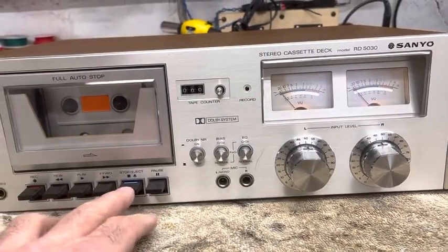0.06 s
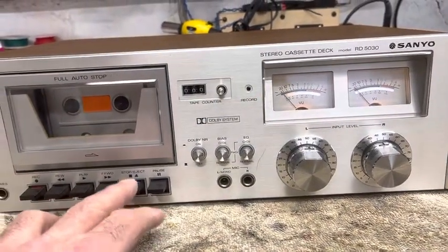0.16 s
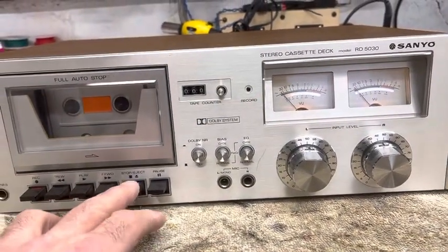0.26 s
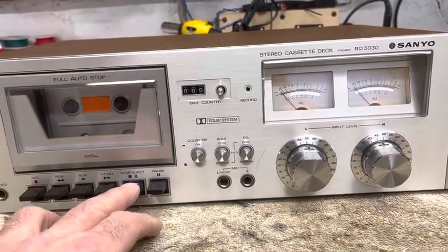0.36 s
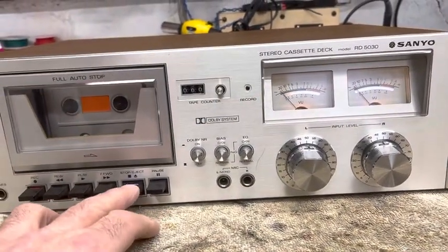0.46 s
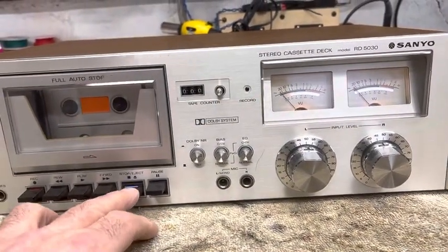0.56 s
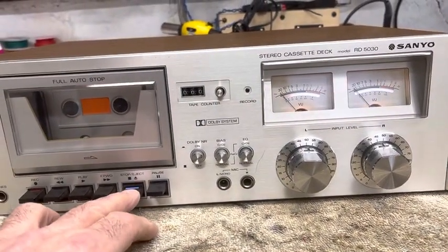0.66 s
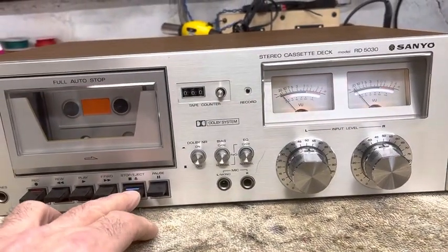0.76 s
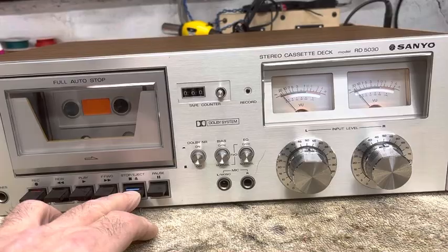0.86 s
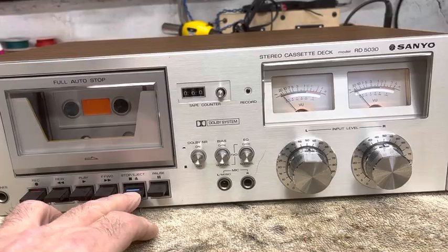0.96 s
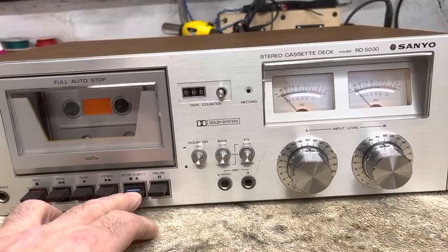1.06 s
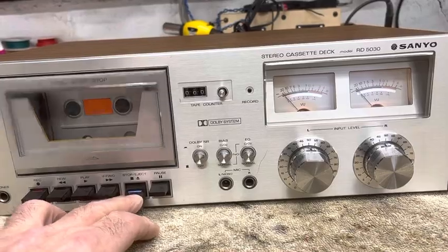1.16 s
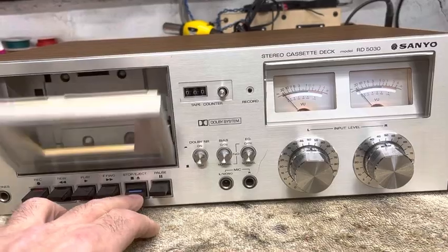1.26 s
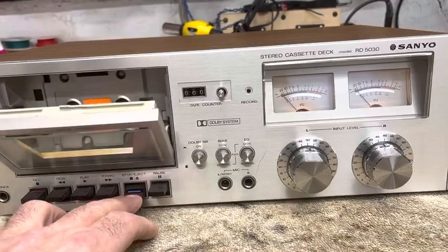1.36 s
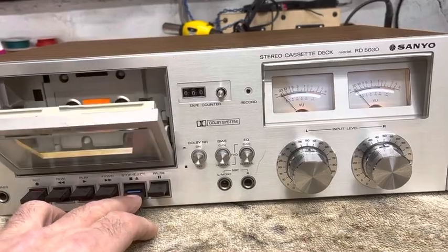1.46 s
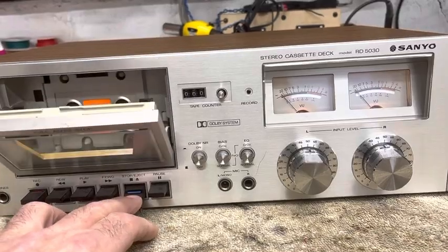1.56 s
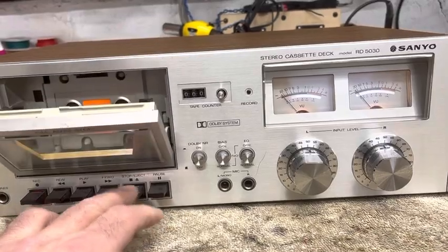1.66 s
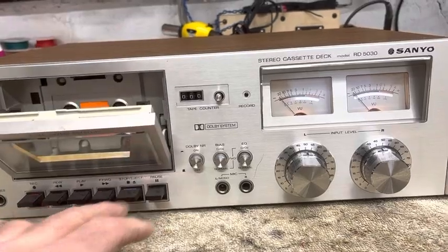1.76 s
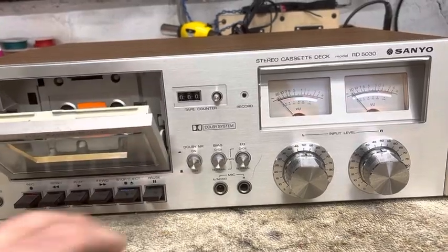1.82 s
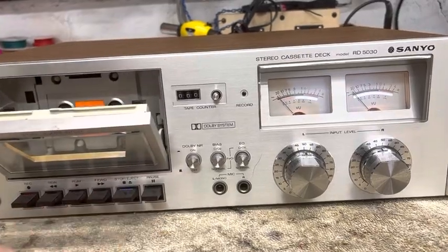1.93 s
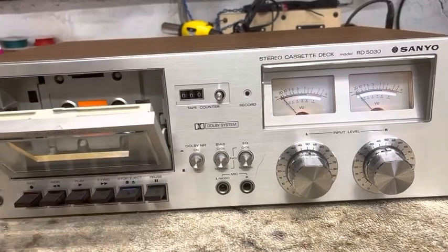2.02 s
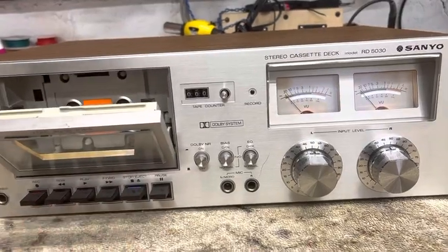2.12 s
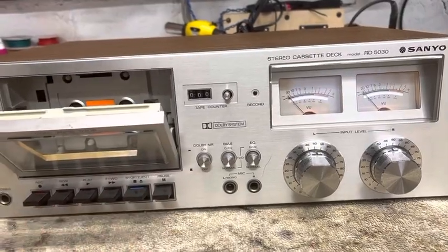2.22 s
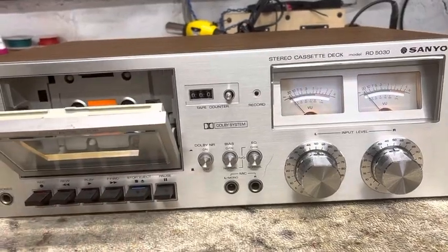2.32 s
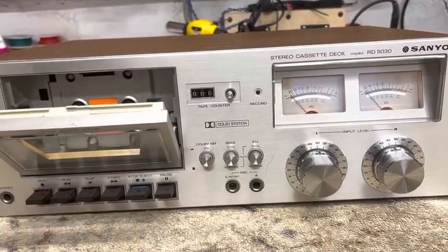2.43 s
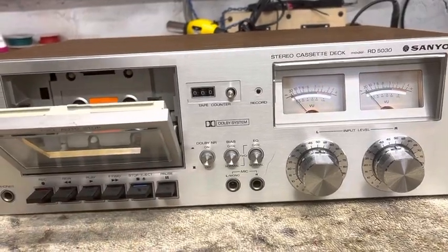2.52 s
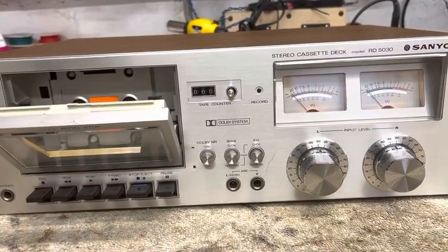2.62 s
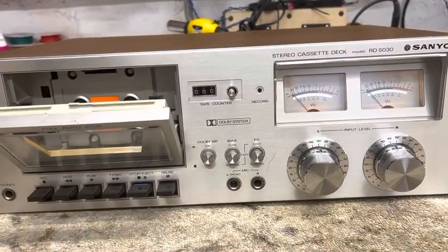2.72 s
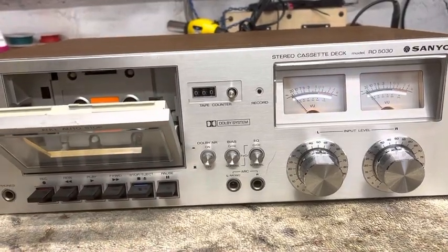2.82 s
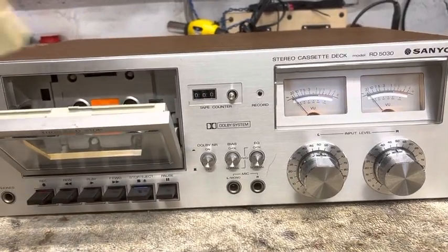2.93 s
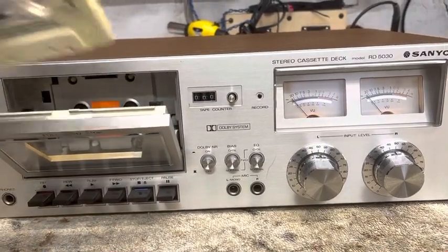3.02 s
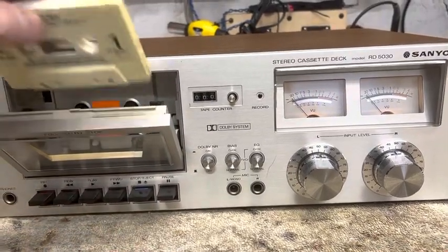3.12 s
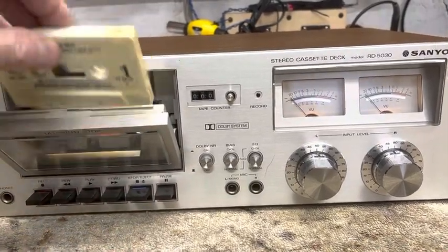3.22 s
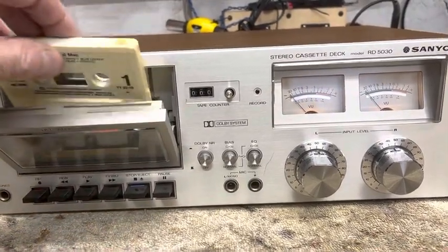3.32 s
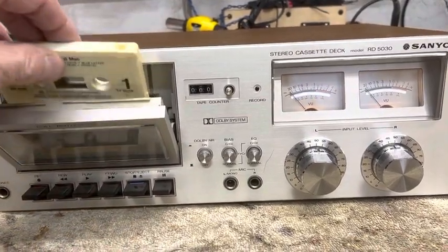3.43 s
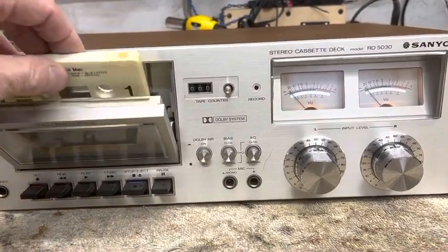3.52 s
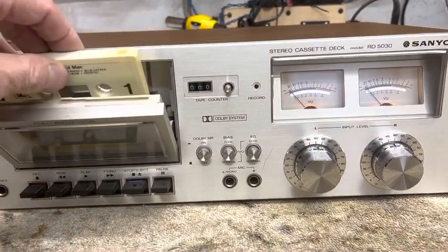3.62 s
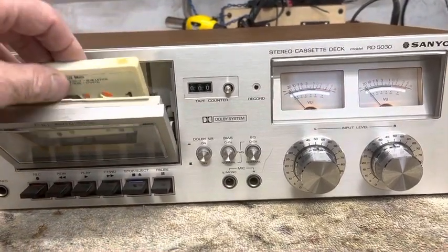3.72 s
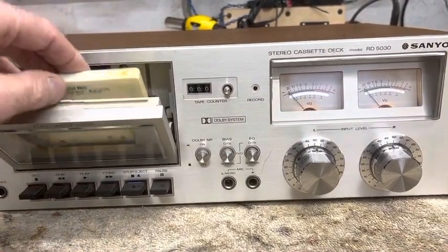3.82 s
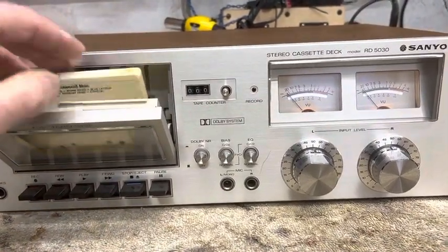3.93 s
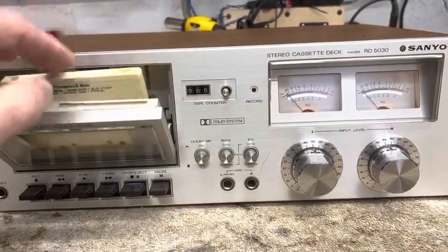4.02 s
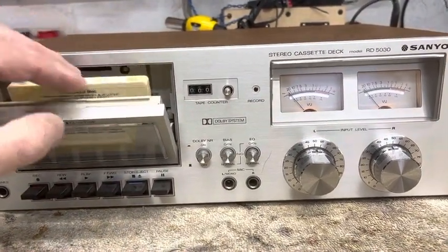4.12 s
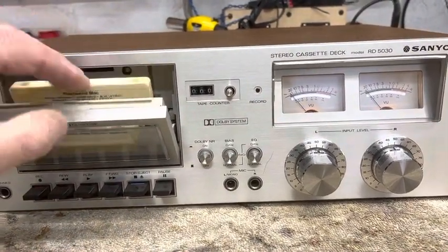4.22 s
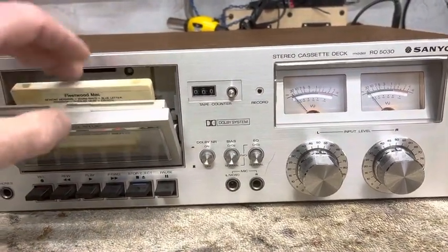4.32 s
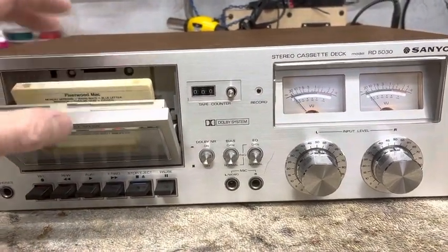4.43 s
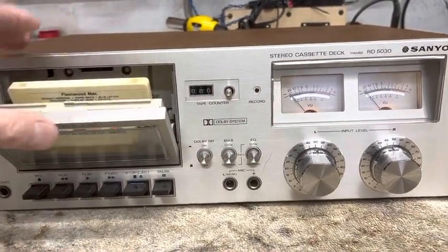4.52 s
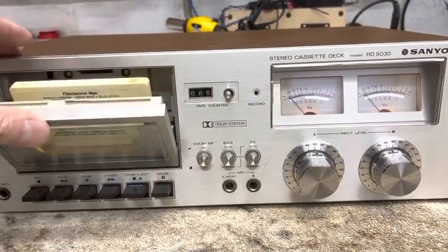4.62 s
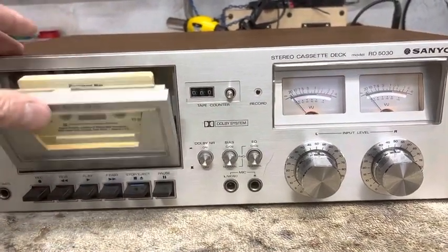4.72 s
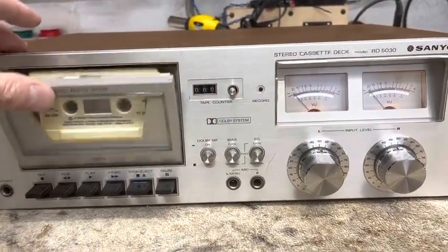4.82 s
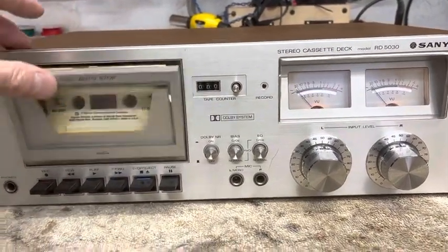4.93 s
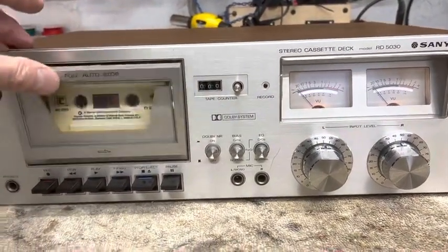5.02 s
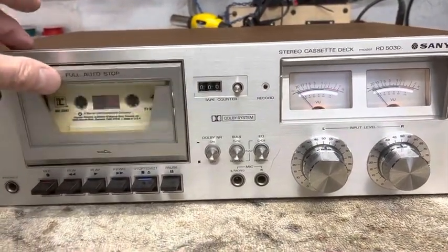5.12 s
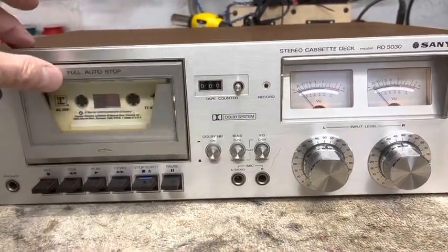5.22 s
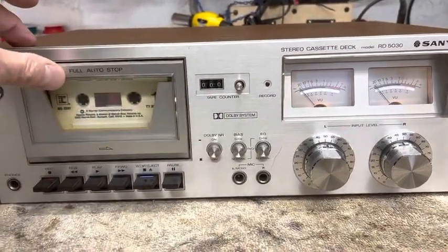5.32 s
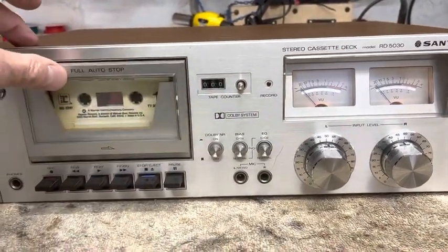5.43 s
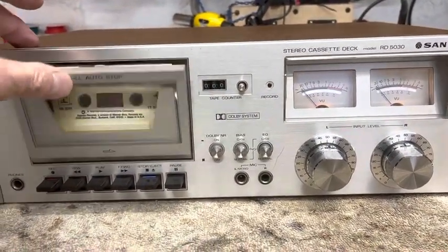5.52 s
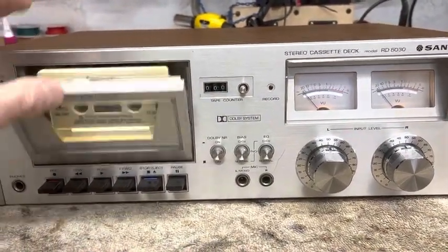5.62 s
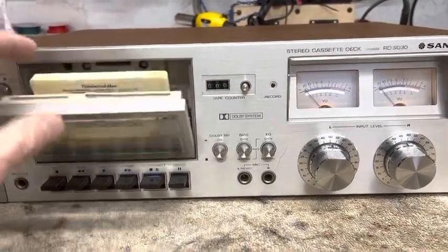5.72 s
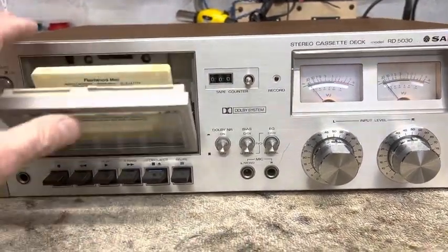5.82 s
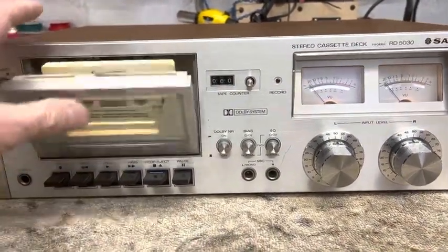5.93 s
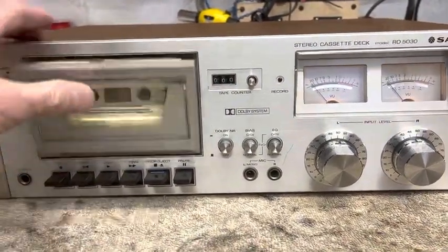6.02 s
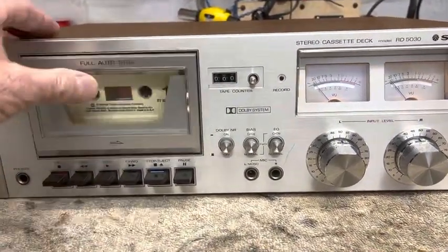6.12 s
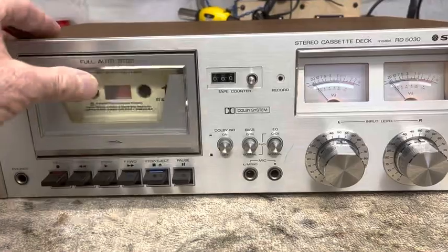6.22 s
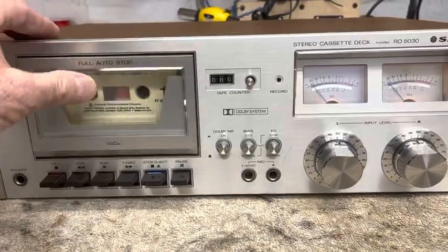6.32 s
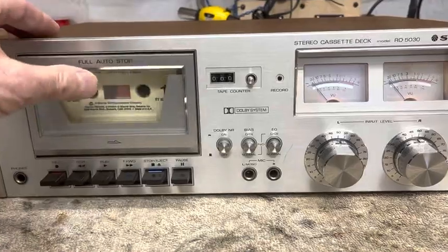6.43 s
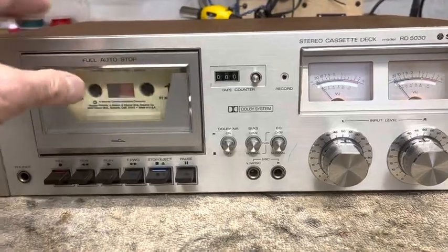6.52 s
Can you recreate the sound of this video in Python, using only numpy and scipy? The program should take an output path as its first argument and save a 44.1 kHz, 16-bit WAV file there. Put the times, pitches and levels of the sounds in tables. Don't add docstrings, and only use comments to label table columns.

```python
import sys
import numpy as np
from scipy import signal
from scipy.fft import rfft, irfft
from scipy.io import wavfile

SR = 44100
rng = np.random.default_rng(int(sys.argv[2]) if len(sys.argv) > 2 else 0)


def elevation(decibels):
    levels = np.asarray(decibels, float)
    return 10 ** (levels / 20)


def generate_wav(signal):
    frames = np.transpose(np.atleast_2d(signal))
    scaled = np.clip(frames, -1, 1) * 32767
    pcm = np.round(scaled).astype(np.int16)
    wavfile.write(sys.argv[1], SR, pcm)


N = 289737


def at_hz(points, hz):
    table_hz, value = np.transpose(points)
    return np.interp(np.log(hz + 1), np.log(table_hz + 1), value)


def rms_one(x):
    return x / np.sqrt(np.mean(x ** 2) + 1e-20)


def peak_one(x):
    return x / np.max(np.abs(x))


def band(x, lo_hz, hi_hz):
    return signal.sosfilt(signal.butter(2, [lo_hz, hi_hz], "band", fs=SR, output="sos"), x)


def ring(x, hz, t60):
    radius, angle = elevation(-60 / (t60 * SR)), 2 * np.pi * hz / SR
    return signal.lfilter([0, np.sin(angle)], [1, -2 * radius * np.cos(angle), radius * radius], x)


def resonant_noise(hz, width_hz):
    t60 = np.log(1000) / (np.pi * width_hz)
    noise = rng.standard_normal(N + SR)
    return rms_one(ring(ring(noise, hz, t60), hz, t60)[SR:])


def coloured(spectrum):
    gain = elevation(at_hz(spectrum, np.fft.rfftfreq(N, 1 / SR)))
    return rms_one(irfft(rfft(rng.standard_normal(N)) * gain, N))


def grains(per_s, uneven_db):
    happens = rng.random(N) < per_s / SR
    size = elevation(uneven_db * np.minimum(rng.exponential(1, N), 3.5))
    return happens * size * rng.choice([-1, 1], N)


def gestures(rows, rise_db_per_s, fall_db_per_s):
    t = np.arange(0, N + 32, 32) / SR
    start, held, *levels = np.array(rows).T[:, :, None]
    rise_db = abs(rise_db_per_s) * np.maximum(start - t, 0)
    fall_db = abs(fall_db_per_s) * np.maximum(t - start - held, 0)
    shape = elevation(-rise_db - fall_db)
    return [np.interp(np.arange(N) / SR, t, np.max(elevation(db) * shape, axis=0)) for db in levels]


def struck(rattle, modes, spread):
    body = 0
    for (hz, db, t60), c in zip(modes, spread):
        body = body + elevation(db) * (1 + .5 * c) * np.sign(c) * ring(rattle, hz, t60)
    return peak_one(body)


# frequency in Hz, level in dB, t60 in seconds.
CABINET_MODES = [(171, -19.5, 0.16), (196, 5.5, .1), (256.6, 0.5, 0.27), (268, -0.5, .08),
                 (349.7, 3.5, 0.055), (443, -1.5, 0.055)]
DOOR_PANEL_MODES = [(472, -11.5, 0.11), (532, -4, .05), (670, -5.5, 0.05), (725, -2.5, 0.067),
                    (759, 1.5, 0.057), (845, -1, 0.048), (970, -10, 0.043), (1039, 0.5, 0.033),
                    (1177, -2.5, 0.054), (1220, -9, 0.065), (1434, -2.5, .04)]
PLASTIC_SHELL_MODES = [(1272, 11, 0.015), (1690, 0.5, 0.0086), (1996, 4.5, 0.0081), (2145, -4, 0.038),
                       (2424, 0, 0.019), (2850, 2.5, 0.01103), (3300, 6, 0.0075), (3710, -4.5, 0.029),
                       (4260, 1.5, 0.0069), (4860, 0.5, 0.0044), (5520, -2, 0.0027), (6020, -23.5, 0.024)]
# time in seconds, peak in dB.
END_STOP_JOLTS = [(1.1983, -18), (1.2303, -23), (1.2474, -24), (1.2875, -22), (1.2992, -28.5),
                  (1.3379, -32.5), (1.6719, -28), (3.324, -28), (3.5263, -31), (3.9015, -29.5),
                  (4.1067, -25), (4.955, -26), (5.22, -26), (5.5977, -33), (6.0423, -32), (6.1664, -29),
                  (6.355, -26)]
CABINET_UNDER_PANEL_DB = -17.5


def contacts(rows):
    rattle_s, rise_s, edge_s = 0.0043, 0.00065, 0.0026
    out, t = np.zeros(N + SR), np.arange(SR // 5) / SR
    for s, click_db, part_hz, panel_db, edge_db in rows:
        jolt = [db for at, db in END_STOP_JOLTS if abs(at - s) < .0045]
        cabinet_db = jolt[0] if jolt else panel_db + CABINET_UNDER_PANEL_DB
        chance, spread = rng.standard_normal((2, len(t))), rng.uniform(-1, 1, (3, 12))

        slow = elevation(.11 * (panel_db + 29.5))
        chatter = np.exp(-t / (rattle_s * slow)) * (1 - np.exp(-t / (rise_s * slow)))
        rattle = chance[0] * np.abs(chance[0]) * chatter

        shell = struck(rattle, PLASTIC_SHELL_MODES, spread[0])
        shell += elevation(0.5) * peak_one(band(rattle, 960, 8440))
        top_hz = np.clip(16000 * elevation(0.32 * (edge_db - click_db)), 2200, 9000)
        shell = band(shell, 630, top_hz)
        loose_part = peak_one(ring(rattle, part_hz, 0.0075))
        click = peak_one(peak_one(shell) + elevation(-6) * loose_part)

        edge_fade = np.exp(-t / edge_s) + .1 * np.exp(-t / 0.0035)
        edge = peak_one(band(chance[1] * edge_fade, 7000, 15000))
        push = band(np.abs(rattle), 130, 320)

        sound = elevation(click_db) * click + elevation(edge_db + 14.5) * edge
        sound += elevation(panel_db) * struck(rattle, DOOR_PANEL_MODES, spread[1])
        sound += elevation(cabinet_db - 6.5) * struck(push, CABINET_MODES, spread[2])
        first = round(s * SR)
        out[first:first + len(t)] += sound
    return out[:N]


# time in seconds, click peak in
# dB, ringing part in Hz, door panel in dB, bright edge in dB.
DOOR_OPENS = [(1.158, -44, 2485, -38, -56.5), (1.222, -19, 4100, -22, -36.5),
              (1.1885, -10.5, 3396, -18, -12), (1.1983, -22, 1750, -18.5, -31.5),
              (1.2303, -16.5, 4000, -26.5, -32), (1.2474, -30.5, 1980, -27.5, -49.5),
              (1.2875, -23, 3710, -38.5, -43), (1.2992, -34, 3930, -25, -44),
              (1.3104, -34, 3600, -33, -61.5), (1.3379, -51, 2230, -31.5, -50),
              (1.6302, -29.5, 2500, -31.5, -42.5), (1.654, -29.5, 6100, -28, -41),
              (1.6719, -28, 5900, -29, -31), (1.6914, -42, 1520, -48, -67)]
CASSETTE_MEETS_HOLDER = [(2.5117, -42, 1660, -33.5, -79), (2.6434, -41, 4660, -49, -52.5),
                         (2.6625, -31.5, 2850, -34.5, -79), (2.693, -39, 2270, -35, -76),
                         (2.7154, -40.5, 1550, -42, -53), (2.7515, -45, 2300, -45, -60),
                         (2.7898, -49, 1640, -46, -57), (2.807, -33, 2400, -56, -71),
                         (2.9614, -38.5, 1810, -51, -93.5), (3.2803, -24.5, 2020, -28.5, -41),
                         (3.3012, -26, 3930, -30.5, -43), (3.324, -33, 1740, -32, -35),
                         (3.4316, -35, 3200, -36, -60), (3.459, -31, 2700, -35.5, -49),
                         (3.4744, -30, 3440, -46, -43), (3.4822, -27.5, 1785, -52, -65),
                         (3.4884, -42, 1780, -43, -49), (3.5163, -33, 1760, -34, -50),
                         (3.5263, -37.5, 2540, -47, -56)]
CASSETTE_DROPS_HOME = [(3.9015, -35.5, 5500, -33, -55), (3.972, -47, 1770, -43, -67),
                       (4.0925, -32, 2400, -29, -41), (4.1069, -17.5, 2300, -18.5, -22.5),
                       (4.2923, -47, 1730, -68, -75), (4.3216, -41, 2620, -39, -62),
                       (4.3443, -46, 1790, -42.5, -74), (4.953, -29, 1490, -27, -62),
                       (5.1873, -46, 1770, -42, -80), (5.219, -16, 3300, -19, -31),
                       (5.3577, -48, 3500, -42, -80)]
DOOR_LATCHES = [(5.5402, -29.5, 2060, -28, -38), (5.5521, -25, 3520, -31, -61),
                (5.574, -29, 3800, -31, -54), (5.5824, -25.5, 3630, -28, -35),
                (5.5976, -34.5, 1930, -45, -49), (5.6267, -36.5, 2190, -32.5, -57),
                (5.7394, -52, 2760, -40, -62), (5.9918, -28.5, 3750, -31, -50.5),
                (6.0092, -36, 4300, -26, -50), (6.0265, -21, 6070, -32, -33),
                (6.0424, -32, 3700, -31.5, -61), (6.124, -36.5, 1770, -38.5, -62),
                (6.138, -22, 1690, -23.5, -37), (6.1662, -6.5, 1650, -6, -21),
                (6.355, -19.5, 2190, -23, -43)]
FURTHER_CONTACTS = [(1.175, -28, 4300, -30, -40), (1.1815, -22, 3900, -28, -40), (1.2055, -30, 5800, -34, -48),
                    (1.2255, -23, 3900, -36, -42), (1.2535, -32, 4100, -34, -55), (1.266, -38, 1900, -40, -60),
                    (2.654, -40, 4800, -48, -62), (2.659, -42, 2500, -46, -70), (2.679, -38, 2800, -40, -70),
                    (2.685, -42, 4900, -46, -66), (5.2135, -33, 7000, -44, -44), (5.2165, -24, 3500, -32, -40),
                    (5.2255, -26, 2000, -27, -32), (5.531, -40, 2300, -42, -66), (5.5355, -34, 1400, -33, -60),
                    (5.5595, -34, 6800, -40, -50), (5.566, -38, 3300, -42, -56), (5.5785, -32, 2900, -36, -50),
                    (5.589, -36, 4000, -34, -58), (5.623, -46, 3000, -40, -70), (6.0315, -30, 3500, -28, -48),
                    (6.048, -38, 2600, -32, -62), (6.154, -34, 1650, -30, -70), (6.1955, -34, 2100, -29, -60),
                    (6.1705, -11, 3700, -15, -27), (3.312, -38, 2400, -33, -60), (3.339, -38, 4900, -36, -62),
                    (3.361, -46, 5300, -46, -70), (1.667, -33, 6500, -38, -44), (1.681, -37, 2600, -36, -50),
                    (1.619, -44, 6800, -50, -60), (6.1455, -34, 2500, -36, -62)]


def handling_clatter():
    loading = CASSETTE_MEETS_HOLDER + CASSETTE_DROPS_HOME
    return contacts(DOOR_OPENS + loading + DOOR_LATCHES) + contacts(FURTHER_CONTACTS)


# time in
# seconds, peak in dB, frequency in Hz, t60 in seconds.
PART_AND_PANEL_PINGS = [(1.2305, -12, 4020, 0.017), (2.513, -36.5, 1700, 0.052), (2.664, -29.5, 1380, 0.044),
                        (2.717, -41.5, 1595, 0.073), (2.964, -37, 1770, 0.04), (3.302, -31, 3820, 0.018),
                        (3.432, -38, 3300, 0.07), (4.955, -39, 4260, 0.016), (5.358, -45, 3420, 0.028),
                        (5.553, -32, 3520, .02), (1.189, -15.5, 6200, .016), (1.66, -29, 577, 0.073),
                        (6.012, -34, 350, .3), (6.19, -27, 310, .14), (6.03, -28, 760, .08),
                        (1.31, -30, 900, .08), (5.221, -26, 545, .07), (6.168, -17, 725, 0.07),
                        (6.168, -16, 3710, 0.028), (6.167, -13.5, 1046, 0.046), (6.357, -24, 1434, 0.028),
                        (6.356, -25.5, 2950, 0.019),
                        (5.541, -35, 850, .1), (5.5745, -34, 794, .06), (5.581, -32, 1180, .09),
                (5.596, -33, 1200, .05), (5.626, -42, 1100, .04), (5.993, -38, 1180, .05),
                (6.0095, -36, 1140, .03), (6.042, -32, 760, .04), (6.143, -32, 735, .1),
                (6.356, -27, 885, .04), (2.693, -41, 900, .03), (1.226, -27, 520, .06),
                (5.22, -21, 2000, .025), (6.171, -14, 1100, .04), (6.17, -20, 2150, .03),
                (5.221, -24, 6100, .012), (3.284, -33, 2000, .03), (3.339, -38, 1100, .05),
                (3.4845, -35, 1750, .025), (3.518, -37, 1150, .03), (3.431, -40, 4700, .012),
                (3.325, -36, 5200, .012), (1.309, -33, 3900, .012), (1.633, -38, 2450, .03),
                (1.33, -38, 95, .3)]


def pings():
    out, t = np.zeros(N + SR), np.arange(SR // 4) / SR
    onset = 1 - np.exp(-t / 0.00049)
    for s, db, hz, t60 in PART_AND_PANEL_PINGS:
        first = round(s * SR)
        out[first:first + len(t)] += elevation(db - 60 * t / t60) * onset * np.sin(2 * np.pi * hz * t)
    return out[:N]


# time in seconds, peak in dB.
CABINET_THUDS = [
    (1.257, -25.5),
    (4.134, -38),
]


def thuds():
    hz, t60, rise_s = 62, 0.39, 0.013
    t, out = np.arange(N) / SR, np.zeros(N)
    for s, db in CABINET_THUDS:
        age = np.maximum(t - s + rise_s, 0)
        swing = (1 - np.exp(-age / rise_s)) * np.sin(2 * np.pi * hz * age)
        out += elevation(db - 60 * age / t60 + 3.5) * swing
    return out


# start in seconds, held in seconds, treble in dB, body in dB.
GUIDE_SCRAPES = [(1.158, .008, -52, -42), (1.178, 0.028, -37, -34), (1.215, 0.038, -39, -35),
                 (1.29, 0.034, -47.5, -38.5), (1.631, .01, -51, -48.5), (1.655, .025, -51, -42),
                 (2.645, .08, -59, -55.5), (3.285, .025, -53, -41.5), (3.315, 0.024, -42.5, -38),
                 (3.435, .055, -60, -57.5), (3.51, 0.031, -51.5, -47.5), (3.73, .025, -74, -49),
                 (3.83, 0.024, -68, -45.5), (3.903, 0.035, -60.5, -47.5), (4.093, 0.021, -39, -41),
                 (4.12, 0.027, -58, -38), (5.2185, .006, -24.5, -51), (5.228, .01, -46, -38),
                 (4.96, .04, -66, -46), (5.538, 0.064, -48, -44), (5.995, 0.031, -52.5, -48),
                 (6.03, 0.0093, -36.5, -33.5), (6.105, .04, -54, -43), (6.14, .03, -50, -35),
                 (6.18, .03, -55, -34)]
SCRAPE_RISE_DB_PER_S, SCRAPE_FALL_DB_PER_S = 4000, 700.0


def scraping():
    treble, body = gestures(GUIDE_SCRAPES, SCRAPE_RISE_DB_PER_S, SCRAPE_FALL_DB_PER_S)
    slips = grains(2000, 3.6)

    def through(modes):
        rings = [elevation(db) * (-1) ** k * ring(slips, hz, t60) for k, (hz, db, t60) in enumerate(modes)]
        return rms_one(sum(rings))

    top = through(PLASTIC_SHELL_MODES) + elevation(-7) * rms_one(band(slips, 5000, 14500))
    return treble * top + body * (through(DOOR_PANEL_MODES) + elevation(1) * through(CABINET_MODES))


# start in seconds, held in seconds, rub in dB, bright rub in dB.
FINGER_STROKES = [(0.14, .018, -70, -66), (1.74, 0.099, -61.5, -69.5), (2.25, .03, -70, -72.5),
                  (2.38, .06, -69, -70), (2.47, 0.062, -63, -67), (2.64, .07, -58, -58),
                  (2.74, .04, -62.5, -61), (2.84, .08, -78, -69), (3.56, .05, -71, -75),
                  (3.72, 0.019, -59, -60), (3.83, .015, -56.5, -59), (3.9, 0.023, -57.5, -57),
                  (4.07, .02, -53, -66), (4.29, 0.016, -68, -66.5), (4.322, 0.013, -59, -71),
                  (4.58, .02, -64, -66), (4.66, 0.34, -73, -79.5), (5.47, .06, -64.5, -71),
                  (5.66, .03, -67, -80), (5.74, 0.0067, -61, -62.5), (5.8, .09, -73, -72)]
STROKE_RISE_DB_PER_S, STROKE_FALL_DB_PER_S = 550.0, 260.0
# a pair of frequency in Hz and width in Hz,
# then a list of start in seconds, held in seconds, level in dB.
SKIN_SQUEAKS = [((7000, 770), [(4.506, 0.072, -65.5)]), ((5350, 130), [(3.902, .008, -56),
                (3.918, 0.022, -60)]), ((5070, 90), [(3.825, .07, -69)]), ((4750, 200),
                [(3.705, .04, -74)]), ((3650, 60), [(3.69, .04, -69), (3.825, 0.035, -64)]), ((11000, 500),
                [(0.14, 0.02, -59)])]
SQUEAK_RISE_DB_PER_S, SQUEAK_FALL_DB_PER_S = 1500.0, 1100.0


def rubbing():
    dull, bright = gestures(FINGER_STROKES, STROKE_RISE_DB_PER_S, STROKE_FALL_DB_PER_S)
    dull_grains = band(grains(9000, 4.0), 1000, 3900)
    bright_grains = band(band(grains(2500, 4.2), 9700, 14400), 9700, 14400)
    out = dull * rms_one(dull_grains) + bright * rms_one(bright_grains)
    for (hz, width_hz), rows in SKIN_SQUEAKS:
        gain = gestures(rows, SQUEAK_RISE_DB_PER_S, SQUEAK_FALL_DB_PER_S)[0]
        out += gain * resonant_noise(hz, width_hz)
    return out


# low edge in Hz, high edge in Hz, t60 in seconds, level in dB.
ROOM_BANDS = [(150, 416, 0.49, 1), (500, 1300, 0.14, -3.5), (1209, 2200, 0.058, 3.5),
              (2400, 4700, 0.22, -8.5), (4430, 4600, 0.15, -7), (9700, 20300, 0.17, -6)]


def room(x):
    out, onset = np.zeros((2, N)), 0.0025 * SR
    for lo_hz, hi_hz, t60, db in ROOM_BANDS:
        stored = signal.lfilter([1], [1, -elevation(-120 / (t60 * SR))], band(x, lo_hz, hi_hz) ** 2)
        energy = signal.lfilter([1 / onset], [1, 1 / onset - 1], stored)
        noise = rms_one(band(rng.standard_normal((2, N)), lo_hz, hi_hz))
        out += elevation(db) * np.sqrt(energy + 1e-20) * noise
    return out


# frequency in Hz, left lead in radians.
PORT_LEAD = [(0, 0), (300, .2), (700, .7), (1100, 1.8), (1400, 2.3), (1700, .8), (2000, .4), (2700, 1),
             (5200, .3), (6400, -.9), (7200, -2.2), (8100, -2.9), (9400, -3.8), (10800, -5.8),
             (12300, -6.4), (13400, -7.3), (14100, -8.4), (14700, -9), (15600, -9.5), (16300, -8.3)]
# frequency in Hz, left minus right in dB.
PORT_LEVEL = [(60, 0), (200, 1), (700, 1), (1300, 1.5), (2400, 3.5), (4400, 3), (8000, 0)]


def ports(x):
    hz = np.fft.rfftfreq(N, 1 / SR)
    phase = np.interp(hz, *np.transpose(PORT_LEAD))
    half = elevation(at_hz(PORT_LEVEL, hz) / 2) * np.exp(.5j * phase)
    return irfft(rfft(x) * np.array([half, 1 / half]), N)


# frequency in Hz, level in dB per Hz.
AIR_COMMON = [(15, -49.5), (25, -29.5), (43, -11.5), (121, -11), (147, -29.5), (169, -5.5), (235, -8.5),
              (290, -14), (385, -11), (413, -26), (454, -16.5), (1040, -21), (1220, -29), (1740, -28),
              (7000, -52), (9100, -101), (15400, -120)]
AIR_DIFFERENCE = [(25, -15.5), (110, -1), (150, -10), (330, -4.5), (700, -4), (1200, -11), (1450, -11),
                  (1620, -7), (1800, -19.5), (2800, -19.5), (3500, -23), (9500, -42), (10800, -61),
                  (16000, -65)]
# frequency in Hz, width in Hz, level in dB.
MOTOR_HUM = [(60, 9, -59.5), (120, 8, -61), (235, 43, -50), (464.7, 22, -60), (1023, 28, -73),
             (1770, 60, -73.5)]
# start in seconds, held in seconds, level in dB.
WHINE_SWELLS = [(.47, .35, -92), (1.4, .4, -94), (4.6, .4, -94)]
WHINE_DB, WHINE_FADE_DB_PER_S = -104, 39.5


def room_tone():
    mid = elevation(-45.5 - 2) * coloured(AIR_COMMON)
    for hz, width_hz, db in MOTOR_HUM:
        mid += elevation(db) * resonant_noise(hz, width_hz)
    hiss = band(band(rng.standard_normal(N), 10200, 14600), 10200, 14600)
    mid += elevation(-86) * rms_one(hiss)
    mid += elevation(-55 + 3.5) * np.sin(2 * np.pi * 118.9 * np.arange(N) / SR)
    swell = gestures(WHINE_SWELLS, WHINE_FADE_DB_PER_S, WHINE_FADE_DB_PER_S)[0]
    mid += (elevation(WHINE_DB) + swell) * resonant_noise(14100, 22.4)
    side = elevation(-56) * coloured(AIR_DIFFERENCE)
    return mid + side * np.array([[1], [-1]])


def scene():
    deck = handling_clatter() + pings() + scraping() + rubbing()
    common, difference = elevation(-38.5) * room(deck)
    near = ports(deck + thuds() + common)
    return near + .3 * difference * np.array([[1], [-1]]) + room_tone()


def roll_off(x):
    return signal.sosfilt(signal.butter(12, 16660, fs=SR, output="sos"), x)


# frequency in Hz, gain in
# dB.
MICROPHONE_RESPONSE = [(20, -15), (45, -3.5), (80, -1.5), (6800, 0.5), (7700, -1), (8600, 0), (9400, -4),
                       (10000, -5.5), (13800, -7), (14700, -12), (16200, -18), (16650, -90)]


def record(dry):
    colour = elevation(at_hz(MICROPHONE_RESPONSE, np.fft.rfftfreq(N, 1 / SR)))
    heard = irfft(rfft(dry) * colour, N)
    return roll_off(1.449 * np.tanh(heard / 1.56))


dry = scene()
out = record(dry)
generate_wav(out)
```